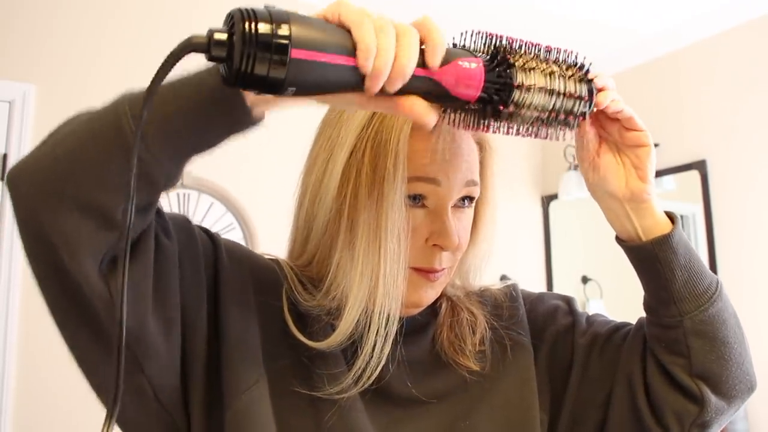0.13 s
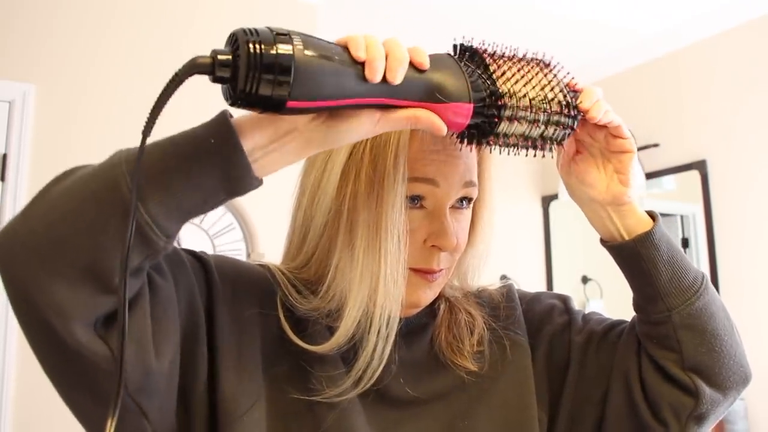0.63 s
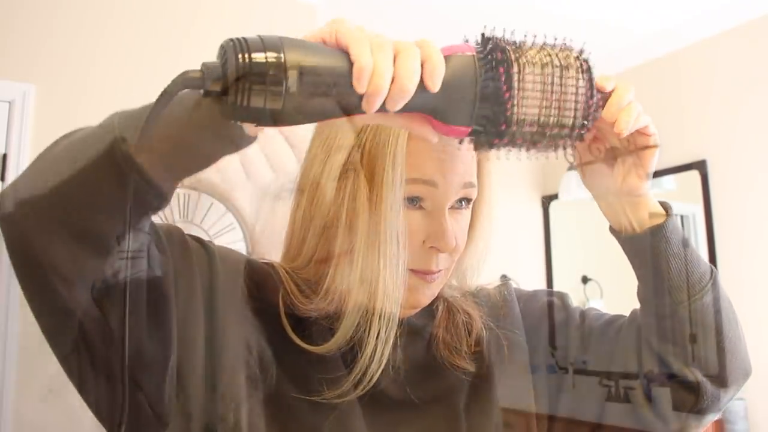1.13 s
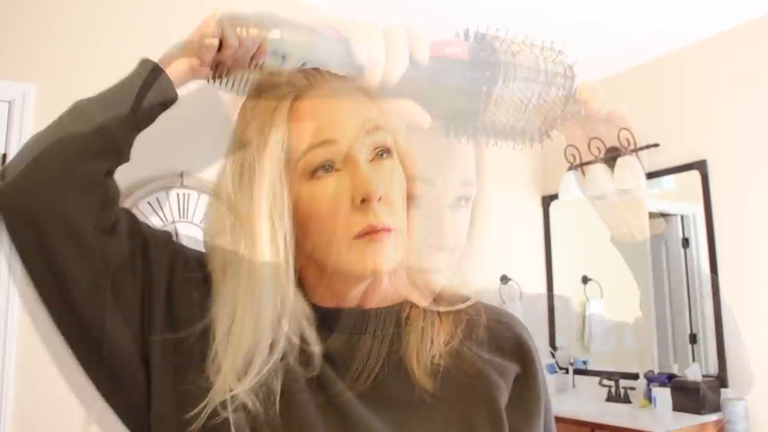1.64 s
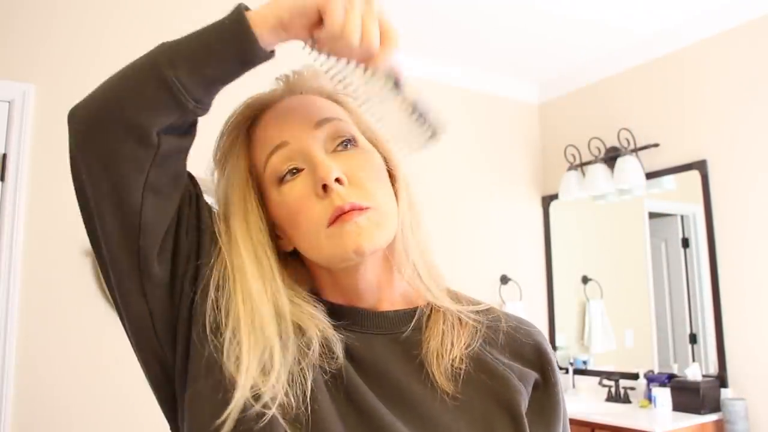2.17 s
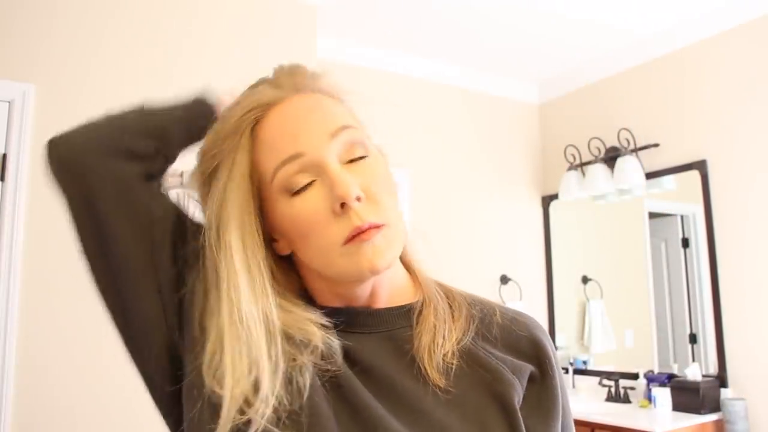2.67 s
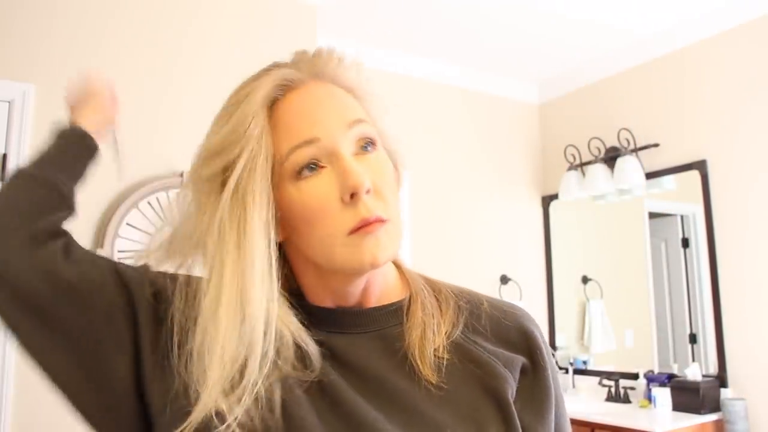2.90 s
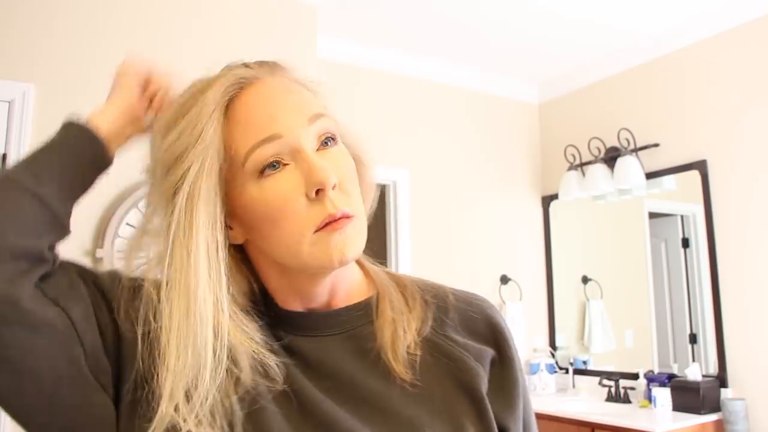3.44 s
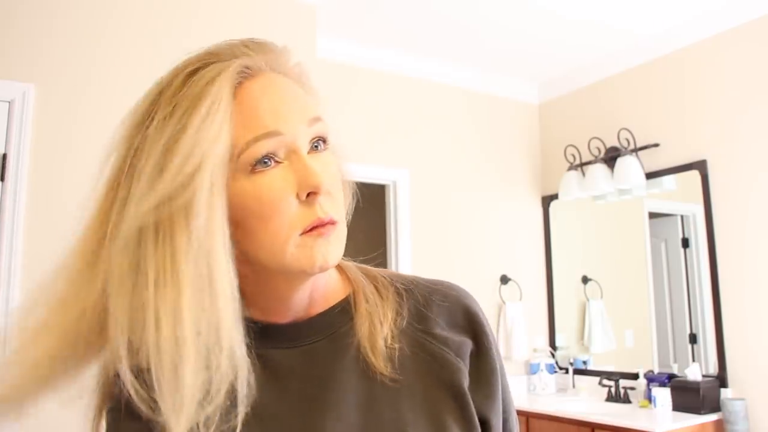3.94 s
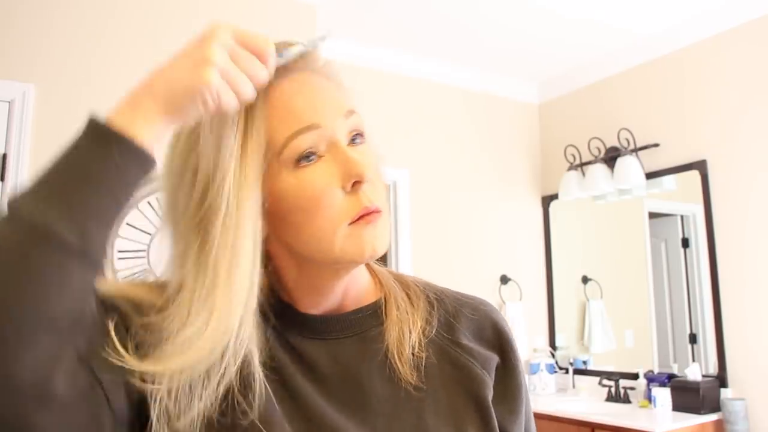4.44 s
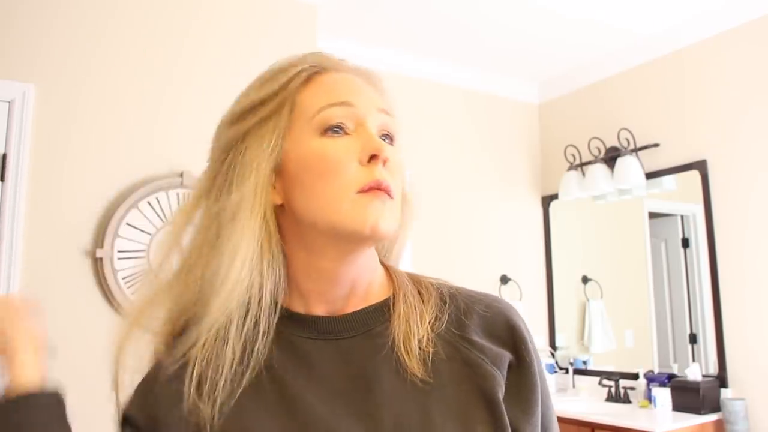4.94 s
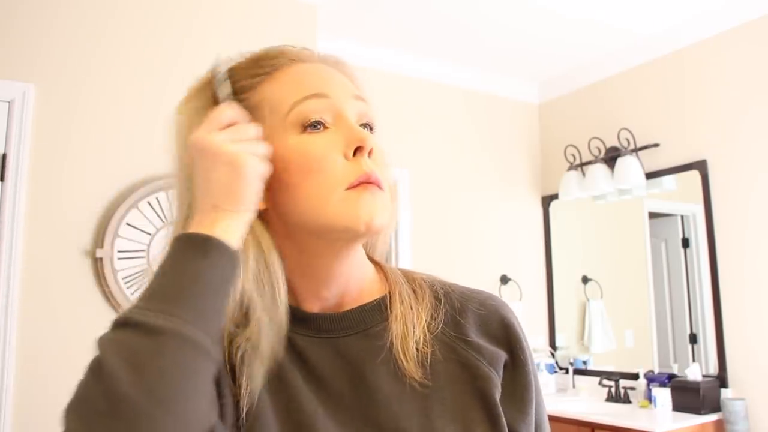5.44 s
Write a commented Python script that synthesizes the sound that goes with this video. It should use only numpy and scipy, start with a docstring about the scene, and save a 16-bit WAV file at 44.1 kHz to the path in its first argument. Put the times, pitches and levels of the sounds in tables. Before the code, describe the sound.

A hot-air brush roars with a high piercing whine, fades away within two seconds, then a comb swishes through long hair in a quiet bathroom.

```python
"""Hot-air brush, then combing

A hot-air brush runs in a hard-walled bathroom, then fades away: its rushing air is coloured noise,
its seven-blade fan whine and shaft tones are wavering sines.
In the quiet a comb is drawn through long hair four times: grainy noise with ringing teeth, a snag and soft bumps.
Behind it are a wavering ventilation hum, a ticking wall clock (short noise bursts into ringing modes),
the small stepping focus motor by the microphone (pushed ringing modes) and room hiss (coloured noise)."""
import sys
import numpy as np
from scipy import signal
from scipy.fft import rfft, irfft
from scipy.io import wavfile
from scipy.ndimage import uniform_filter1d

SR = 44100
rng = np.random.default_rng(int(sys.argv[2]) if len(sys.argv) > 2 else 0)


def dump_mix(stems):
    """Bounce the given channels to the path in sys.argv[1] as a 16-bit WAV at rate SR."""
    frames = np.atleast_2d(stems).T  # one column per channel
    limited = np.clip(frames, -1, 1)  # hard clip at full scale
    pcm = np.round(limited * 32767).astype(np.int16)
    wavfile.write(sys.argv[1], SR, pcm)


def amplitude_ratio(level_db):
    """Convert a level in decibels to the matching linear amplitude (field) ratio."""
    exponent = np.asarray(level_db, float) / 20
    return 10 ** exponent


N = 246078  # length in samples

# Spectra and lifts give a sound's colour only; its loudness is set elsewhere.
# Likeness of left and right is given before the wall echoes turn the phase.

# room hiss and ventilation rumble: [f/Hz, level per Hz/dB]
HISS_SPECTRUM = [(12, -40), (40, -27), (60, -9), (85, -3), (130, -10.5), (200, -10), (420, -11.5),
                 (580, -12), (750, -14), (1340, -15.5), (3750, -19.5), (10500, -29.5), (15700, -36.5)]
# likeness of left and right in the hiss: [f/Hz, likeness from -1 to 1]
HISS_LIKENESS = [(60, 0.59), (180, -0.12), (550, -0.4), (1650, -0.5), (4970, -0.2), (15000, -0.11)]
# ventilation tone, swelling slowly, rms before the waver and panning: [t/s, hum level/dB, octave level/dB]
HUM_SWELL = [(1.8, -69.5, -77), (1.9, -64, -82), (2.3, -69, -73), (2.55, -63, -68.5), (2.9, -75, -73),
             (3.05, -62, -65), (3.27, -59.5, -64), (3.34, -65, -67), (3.45, -61.5, -68.5),
             (3.87, -55, -62.5), (3.97, -60.5, -66.5), (4.2, -64, -61), (4.3, -73, -60.5),
             (4.5, -68, -62.5), (4.9, -53, -66.5), (5.0, -61, -64), (5.09, -52, -68), (5.3, -57, -63.5),
             (5.47, -67, -75), (5.58, -72, -75)]
# clock ticks: [t/s, strength of the burst/dB]
CLOCK_TICKS = [(2.42, -52), (3.42, -54), (4.42, -63), (5.42, -53)]
# ringing parts of the clock: [f/Hz, relative strength/dB, time to fall by 60 dB/s]
CLOCK_MODES = [(724, 0, 0.099), (808, -4, .08), (940, -7, .06), (1460, -8, .05)]
# housing modes of the focus motor, low then high: [f/Hz, time to fall by 60 dB/s, left minus right/dB]
MOTOR_MODES = [(522, .035, -1.6), (648, .035, -.8)]
# usual strength of a motor step: [low mode/dB, high mode/dB]
STEP_DB = [-63, -65.5]
# steps that drive the high mode hard and leave the low one faint: [t/s, high mode strength/dB]
HARD_STEPS = [(2.399, -57), (3.066, -59), (3.534, -58), (3.6, -58.5), (3.901, -57), (3.967, -56),
              (4.334, -57.5), (4.735, -59), (4.935, -61.5), (5.169, -60), (5.469, -60)]
# comb and sleeve bumps: [t/s, strength before softening/dB, thud f/Hz]
BUMPS = [(2.769, -54, 270), (3.035, -50, 150), (3.6, -50, 90), (3.806, -39.5, 306), (3.815, -39, 424),
         (3.86, -46, 145), (5.0, -48, 170)]
# comb strokes, one table each: [t/s, swish level/dB, lift of the body band/dB,
# high tooth ring f/Hz, ring level relative to the swish/dB]
STROKES = [
    [(2.34, -61.5, 0, 4850, -18), (2.52, -56.5, -4, 4820, -16), (2.72, -52, -4, 5060, -16),
     (2.82, -51, 2, 4740, -14), (2.87, -61.5, 3, 4750, -14)],
    [(3.3, -60, -11, 4740, -7), (3.39, -52, -4, 4850, -12), (3.655, -56.5, 2.5, 5060, -20),
     (3.685, -51, -6, 5120, -9), (3.76, -54.5, 1, 4850, -14), (3.82, -48, -4, 4650, -6.5),
     (3.92, -61.5, 1, 4680, -4)],
    [(4.42, -67, 3, 5100, -12), (4.52, -58.5, -4, 4710, -5), (4.65, -50.5, 1, 4620, -6),
     (4.67, -50, 1, 5660, -12), (4.76, -47, -2.5, 5500, -20), (4.88, -55.5, 1.5, 5450, -13)],
    [(5.36, -62.5, -6, 4850, -18), (5.48, -61, -6, 5300, -16), (5.58, -58, -6, 5600, -12)],
]
# colour of a stroke, firm ones duller: [f/Hz, lift at the usual pressure/dB, dB gained per dB of swish]
STROKE_COLOUR = [(1500, 1.0, -.15), (4870, 0, 0.), (8200, 2.0, -.55), (13800, 1.5, -.35)]
# noise of hair over the comb: [f/Hz, level per Hz/dB]
HAIR_SPECTRUM = [(300, -12), (800, -10), (2200, -8), (3500, -5.5), (6500, -8), (11000, -15), (15700, -19)]
# likeness of left and right in the swish: [f/Hz, likeness from 0 to 1]
HAIR_LIKENESS = [(60, 0.72), (240, 0.43), (950, 0.3), (3770, 1), (15000, 0.1)]
# peaks and dips from the comb's teeth: [f/Hz, width/Hz, lift/dB]
TEETH = [(2230, 300, -3), (2900, 700, 3), (5000, 1200, 4), (6400, 700, -3), (7800, 500, -2),
         (8900, 1100, 5.5), (12300, 1500, -3), (14200, 1200, 3)]
# rushing air: [f/Hz, level per Hz/dB]
AIR_SPECTRUM = [(35, -80), (60, -56), (118, -29.5), (300, -20), (443, -19.5), (810, -9), (1050, -10.5),
                (1250, -6), (2250, -8.5), (3340, -5.5), (3670, -11), (4630, -13), (8280, -18.5),
                (12500, -26.5), (14500, -33), (15600, -43)]
# barrel and duct resonances: [f/Hz, width/Hz, lift/dB]
BARREL = [(236, 5.6, 7), (304, 19, 7), (386, 23, 5.5), (659.5, 48, 9.5), (851, 6.8, 9), (1307, 17, 2.5),
          (1590, 50, 2.5), (1804, 9, 11), (1842, 4.9, 6), (2140, 32, 9), (2618, 134, 7), (3010, 13, 5),
          (4150, 310, 8.5), (5290, 170, 6), (5870, 510, 5), (6530, 160, 6), (7100, 280, 7.5),
          (8230, 340, 8.5), (9560, 160, 6), (10200, 200, 4.5), (12200, 700, 0.5)]
# likeness of left and right in the air: [f/Hz, likeness from 0 to 1]
AIR_LIKENESS = [(60, .85), (250, 1), (1000, 0.83), (2400, 0.88), (6000, 0.88), (15000, 0.13)]
# balance of the air: [f/Hz, left minus right/dB]
AIR_BALANCE = [(60, -4), (130, 2), (290, -3.5), (640, 1), (1410, -1), (3100, 0), (6820, -1.0), (15000, 1.5)]
# whine without the fade, swelling and shifting as the brush turns, rms:
# [t/s, blade level/dB, octave level/dB, left minus right of the blade tone/dB]
WHINE = [(0.0, -25, -34.5, -8), (0.1, -24, -34.5, -6.5), (0.26, -25.5, -39, -2), (0.41, -22, -42, -6),
         (0.51, -26, -43, -6), (0.58, -23.5, -38.5, -4), (0.8, -28, -31.5, -11.5), (0.93, -31, -36, -2),
         (1.02, -29.5, -39, -3), (1.13, -28, -42, 3), (1.2, -23, -46, -5), (1.415, -19.5, -37, 1),
         (1.555, -25.5, -48, 4), (1.7, -26.5, -48, -6), (1.9, -31, -48, 0)]
# other shaft tones: [multiple of the shaft rate, level relative to the air/dB]
SHAFT_TONES = [(1, -28.5), (3, -21), (5, -15), (6, -20), (8, -24), (10, -40), (13, -33)]

HISS_DB, RUMBLE_DB, RUMBLE_WAVER_DB = -54, -3.0, 2.0
HUM_HZ, HUM_WAVER_DB = 124.7, 1.5
# focus motor: bursts of four steps, two beats apart, a burst every nine beats
BEAT_S, FIRST_BURST_S = 1 / 29.97, 1.7316
STEP_SPREAD_DB, STEP_LEAN_DB = 1.0, 1.5  # lean: one mode gains what the other loses
HARD_LOW_DB = -70  # strength of the low mode in a hard step
STROKE_ATTACK_S, STROKE_RELEASE_S = .03, 0.047
USUAL_SWISH_DB = -55
BODY_HZ, LOW_TOOTH_HZ, TOOTH_WANDER_HZ = 2900, 2764, 60
SNAG_S, SNAG_DB = 3.805, -44  # a knot lets go; dB applied to the raw slips
BLADES, BLADE_HZ = 7, 3390
AIR_DB, AIR_PAN_DB = -20.5, -0.4  # full blast; left minus right
FADE_START_S, FADE_END_S = 1.105, 1.912
FADE_POWER = 1.64  # height = (share of time left) ^ power
FADE_PAN_DB, FADE_BRIGHT_DB = 0.5, 1  # drift of place and brightness over the fade


def rms_one(x):
    """Scale to an rms (average strength) of one."""
    return x / np.sqrt(np.mean(x ** 2) + 1e-20)


def in_time(rows):
    """Read the columns of a time table at every sample, joined by straight lines."""
    s, *columns = np.transpose(rows)
    return [np.interp(np.arange(N) / SR, s, column) for column in columns]


def at_hz(points, hz):
    """Read a table along a logarithmic frequency axis."""
    table = np.array(points)
    return np.interp(np.log(hz), np.log(table[:, 0]), table[:, 1])


def drift(rate_hz):
    """Slow random wandering of unit rms: noise smoothed twice, made at every 40th sample."""
    r = np.exp(-80 * np.pi * rate_hz / SR)
    noise = rng.standard_normal(N // 40 + 2002)
    slow = signal.lfilter([1], [1, -2 * r, r * r], noise)[2000:]  # drop the filter's start
    return np.interp(np.arange(N) / 40, np.arange(len(slow)), rms_one(slow))


def panned(x, pan_db):
    """Place a sound between left and right by a level difference."""
    return x * amplitude_ratio(np.multiply.outer([.5, -.5], pan_db * np.ones(N)))


def ring(clicks, hz, t60):
    """A ringing part: each unit click starts a sine of height 1 that falls by 60 dB in t60 seconds."""
    r = amplitude_ratio(-60 / (t60 * SR))
    w = 2 * np.pi * hz / SR
    return signal.lfilter([0, np.sin(w)], [1, -2 * r * np.cos(w), r * r], clicks + 1e-18)


def clicks_at(times, heights):
    """Single-sample clicks at the given seconds."""
    out = np.zeros(N)
    out[(np.asarray(times) * SR).astype(int)] = heights
    return out


def rush(source, spectrum, peaks, likeness, moving, slow_db, fast_db,
         balance=((20, 0), (20000, 0)), echo_rad=0., ripple_db=0.):
    """Colour two noises into stereo; each band flickers by itself and follows the moving (Hz, dB) colour."""
    hz = np.maximum(np.fft.rfftfreq(N, 1 / SR), 1)
    colour_db = at_hz(spectrum, hz)
    for f, width, db in peaks:
        colour_db = colour_db + db / (1 + (2 * (hz - f) / width) ** 2)
    alike = np.clip(at_hz(likeness, hz), -1, 1)
    mid, side = rfft(source) * amplitude_ratio(colour_db)
    pair = np.sqrt(1 + alike) * mid + np.sqrt(1 - alike) * side * [[1], [-1]]
    # wall echoes turn the phase between the ears, more so in the treble
    turn = np.interp(hz, np.arange(0, 24000, 200), rng.standard_normal(120))
    turn = turn * echo_rad * np.sqrt(hz / 5000)
    halves = np.array([[.5], [-.5]])
    pair = pair * amplitude_ratio(at_hz(balance, hz) * halves) * np.exp(1j * turn * halves)
    pair = pair / np.sqrt(np.mean(irfft(pair, N) ** 2))
    # standing waves ripple the colour finely
    ripple = np.interp(hz, np.arange(0, 24000, 20), rng.standard_normal(1200))
    pair = pair * amplitude_ratio(ripple_db * ripple)
    out = 0
    anchors = np.log2([f for f, db in moving])
    for octave in np.arange(4, 14.6, .75):  # overlapping bands, centred at 2 ** octave Hz
        distance = np.clip((np.log2(hz) - octave) / .75, -1, 1)
        share = np.cos(np.pi / 2 * distance) ** 2
        moved_db = 0
        for row, (f, db) in zip(np.eye(len(moving)), moving):
            moved_db = moved_db + np.interp(octave, anchors, row) * db
        flicker_db = slow_db * drift(2.6) + fast_db * drift(14)
        out = out + irfft(pair * share, N) * amplitude_ratio(moved_db + flicker_db)
    return out


def room_hiss():
    """Room hiss over a lumpy ventilation rumble: coloured noise whose low end wavers."""
    moving = [(80, RUMBLE_DB + RUMBLE_WAVER_DB * drift(4.0)), (200, 0.009)]
    noise = rng.standard_normal((2, N))
    return amplitude_ratio(HISS_DB) * rush(noise, HISS_SPECTRUM, [], HISS_LIKENESS, moving, .7, 0.42, echo_rad=0.4)


def hum():
    """Ventilation fan: a tone and its octave, each wavering in level, with a slightly unsteady pitch."""
    db, octave_db = in_time(HUM_SWELL)
    turn = 2 * np.pi * np.cumsum(HUM_HZ + .6 * drift(1.1)) / SR
    tone = amplitude_ratio(db + HUM_WAVER_DB * drift(3.8)) * np.sin(turn)
    octave = amplitude_ratio(octave_db + HUM_WAVER_DB * drift(5.0)) * np.sin(2 * turn)
    return np.sqrt(2) * panned(tone + octave, -1.5)


def clock():
    """One dull tick a second: the walls blur it into a short noise burst that sets the clock's modes ringing."""
    times, level_db = np.transpose(CLOCK_TICKS)
    swell = np.convolve(clicks_at(times, amplitude_ratio(level_db)), np.hanning(700))[:N]
    burst = swell * rng.standard_normal((2, N)) / 12
    return sum(amplitude_ratio(db) * ring(burst, hz, t60) for hz, db, t60 in CLOCK_MODES)


def focus_motor():
    """Each motor step drives two housing modes for a few cycles, a little differently at each microphone."""
    beats = np.add.outer(9 * np.arange(13), [0, 2, 4, 6]).ravel()
    times = FIRST_BURST_S + BEAT_S * beats
    chance = rng.standard_normal((len(times), 3))
    spread_db = STEP_SPREAD_DB * chance[:, :2]
    lean_db = STEP_LEAN_DB * chance[:, 2:] * [1, -1]
    levels_db = STEP_DB + spread_db + lean_db
    for s, db in HARD_STEPS:
        levels_db[np.argmin(np.abs(times - s))] = HARD_LOW_DB, db
    out = 0
    for k, (hz, t60, pan_db) in enumerate(MOTOR_MODES):
        # one push a cycle, swelling and easing off
        pushes = clicks_at(np.arange(12) / hz, np.hanning(14)[1:-1])[:1200]
        late = rng.normal(0, .09, (2, len(times))) / hz  # a small fraction of a cycle
        pair = [clicks_at(times - .005 + lag, amplitude_ratio(levels_db[:, k])) for lag in late]
        drive = signal.fftconvolve(pair, [pushes])[:, :N]
        out = out + panned(ring(drive, hz, t60), pan_db)
    return out


def bumps():
    """Soft low thuds of comb and sleeve: ringing tones smoothed by a contact of about 2 ms."""
    thuds = sum(ring(clicks_at([s], amplitude_ratio(db)), hz, 0.13) for s, db, hz in BUMPS)
    return signal.lfilter([.03 ** 2], [1, -2 * .97, .97 ** 2], thuds)


def tooth_ring(hz, width_hz):
    """Narrow noise at a gliding pitch: the teeth ring higher as the hair grips them nearer the tip."""
    low = signal.butter(2, width_hz / 2, fs=SR, output="sos")
    a, b = signal.sosfilt(low, rng.standard_normal((2, 3, N)))
    turn = 2 * np.pi * np.cumsum(hz) / SR
    shared, *own = a * np.cos(turn) + b * np.sin(turn)  # one for both ears, one for each
    return rms_one(shared + 0.96 * np.array(own)) * amplitude_ratio(3.2 * drift(8.8))


def combing():
    """Many strands slip over the teeth: a dense, slightly grainy swish with the teeth ringing in it."""
    level_db, body_db, high_hz, ring_db = in_time(np.vstack(STROKES))
    t = np.arange(N) / SR
    stroking = 0
    for stroke in STROKES:
        start, end = stroke[0][0], stroke[-1][0]
        corners = [start - STROKE_ATTACK_S, start, end, end + STROKE_RELEASE_S]
        stroking = stroking + np.interp(t, corners, [0, 1, 1, 0])
    grain_db = 2.4 * np.minimum(rng.exponential(1, (2, N)), 3.5)
    slips = amplitude_ratio(grain_db) * rng.standard_normal((2, N))
    moving = [(hz, db + slope * (level_db - USUAL_SWISH_DB)) for hz, db, slope in STROKE_COLOUR]
    moving.insert(1, (BODY_HZ, body_db))
    swish = rush(slips, HAIR_SPECTRUM, TEETH, HAIR_LIKENESS, moving, 1.0, 0.97, echo_rad=0.94)
    low_hz = LOW_TOOTH_HZ + TOOTH_WANDER_HZ * drift(3.0)
    low_ring = amplitude_ratio(body_db - 12.0) * tooth_ring(low_hz, 260)
    high_ring = amplitude_ratio(ring_db) * tooth_ring(high_hz, 180)
    snag_shape = np.exp(-np.abs(t - SNAG_S) / 0.0051) * (t > SNAG_S - .002)
    snag = amplitude_ratio(SNAG_DB) * uniform_filter1d(slips, size=3) * snag_shape
    return panned((swish + low_ring + high_ring) * amplitude_ratio(level_db) * stroking, -.6) + snag


def fade():
    """The dryer fades away: the share of the fade still to come, and the level it leaves in dB."""
    left = np.clip((FADE_END_S - np.arange(N) / SR) / (FADE_END_S - FADE_START_S), 1e-5, 1)
    return left, 20 * FADE_POWER * np.log10(left)


def dryer_whine():
    """Blade tone, octave and shaft tones; wall echoes make each waver and differ between the ears."""
    blade_db, octave_db, pan_db = in_time(WHINE)
    shaft_hz = (BLADE_HZ + 1.5 * drift(3.0)) / BLADES
    turn = 2 * np.pi * np.cumsum(shaft_hz) / SR + 0.01 * drift(29.5)
    lag = np.array([[0], [1]])  # only the right channel's phase is shifted
    blade = np.sin(BLADES * turn + lag * (0.2 + 0.49 * drift(2.5)))
    out = panned(amplitude_ratio(blade_db + 0.23 * drift(22)) * blade, pan_db)
    octave = np.sin(2 * BLADES * turn + lag * (1.1 + .4 * drift(2.5)))
    out += amplitude_ratio(octave_db + 0.83 * drift(19)) * octave
    for multiple, db in SHAFT_TONES:
        tone = np.sin(round(multiple) * turn + lag * 0.67 * drift(2.2))
        out += panned(amplitude_ratio(AIR_DB + db + 2.9 * drift(2.3)) * tone, 1.3 * drift(4.4))
    return np.sqrt(2) * out * amplitude_ratio(fade()[1])


def dryer_air():
    """Turbulent air through the barrel: noise coloured by the barrel and duct resonances."""
    left, fade_db = fade()
    moving = [(2900, 0.0046), (7000, FADE_BRIGHT_DB * (1 - left))]
    noise = rng.standard_normal((2, N))
    air = rush(noise, AIR_SPECTRUM, BARREL, AIR_LIKENESS, moving, 0.91, 0.38, AIR_BALANCE,
               echo_rad=1.0, ripple_db=2.0)
    return panned(air * amplitude_ratio(AIR_DB + fade_db), AIR_PAN_DB + FADE_PAN_DB * (1 - left))


def scene():
    """All sources added together, from the background to the dryer."""
    background = room_hiss() + hum() + clock() + focus_motor()
    return background + bumps() + combing() + dryer_whine() + dryer_air()


def low_pass(x):
    """Removes everything above the highest recorded frequency."""
    return signal.sosfilt(signal.butter(12, 15680, fs=SR, output="sos"), x)


def record(dry):
    """Turn the finished mix into the output sound."""
    return low_pass(dry)


dry = scene()
out = record(dry)
dump_mix(out)
```